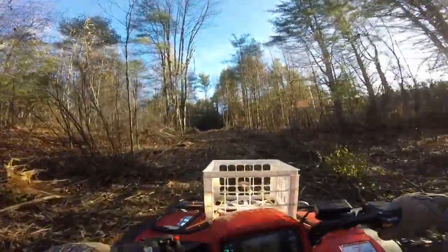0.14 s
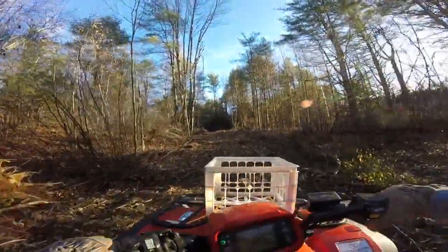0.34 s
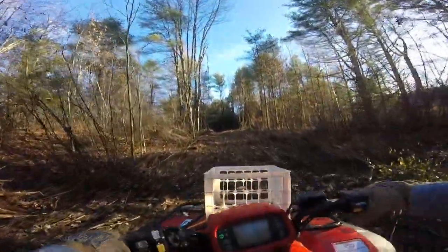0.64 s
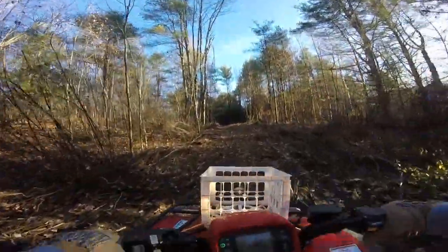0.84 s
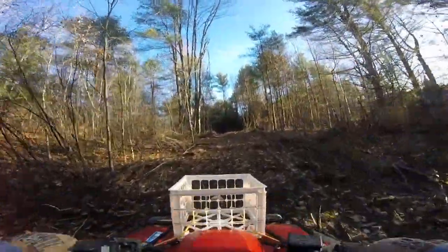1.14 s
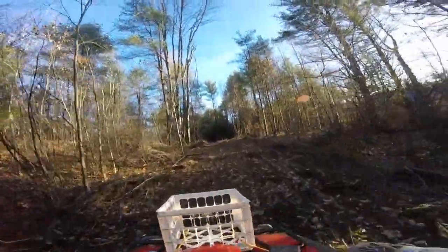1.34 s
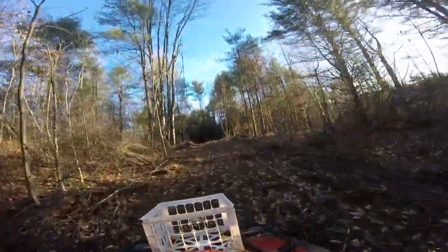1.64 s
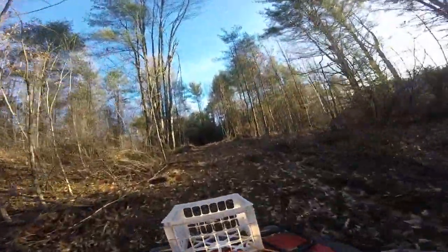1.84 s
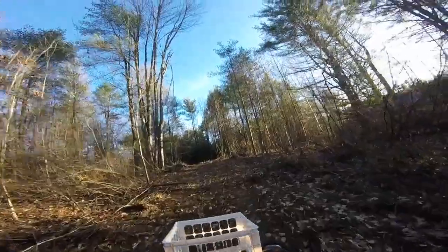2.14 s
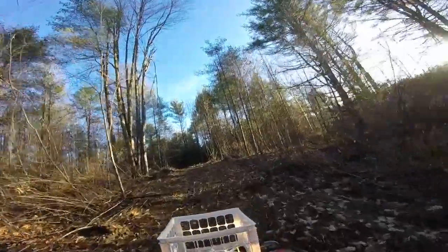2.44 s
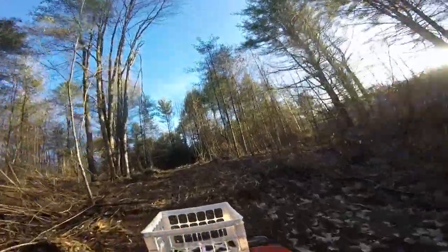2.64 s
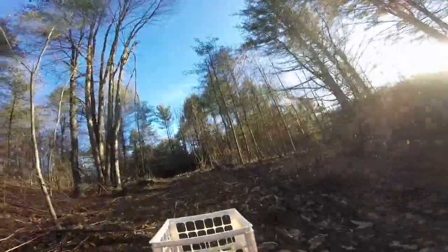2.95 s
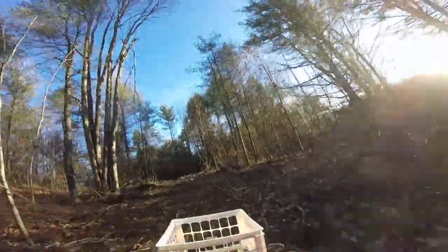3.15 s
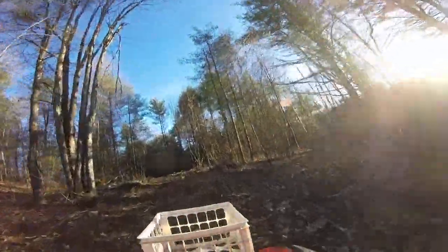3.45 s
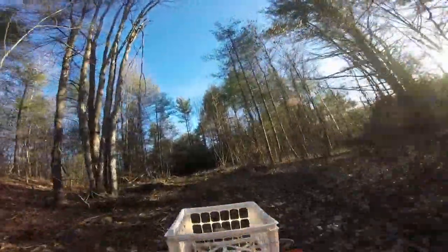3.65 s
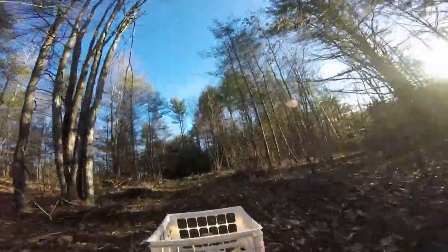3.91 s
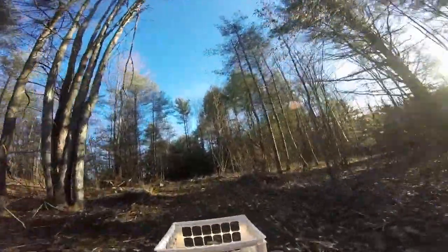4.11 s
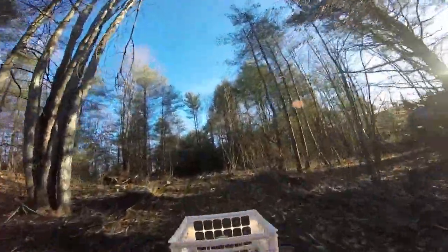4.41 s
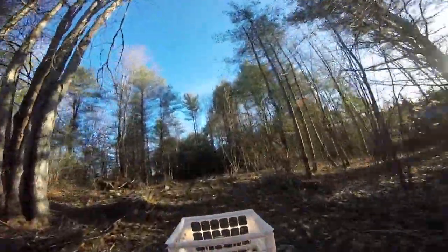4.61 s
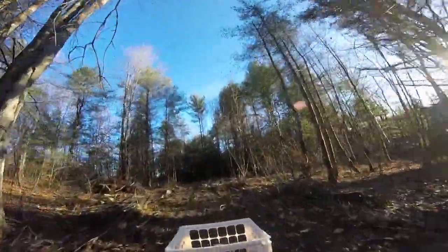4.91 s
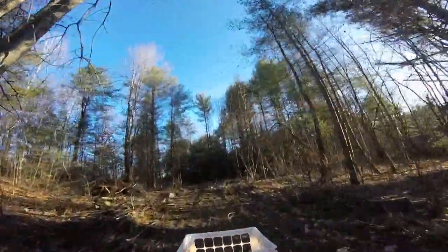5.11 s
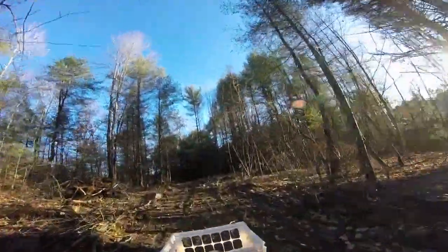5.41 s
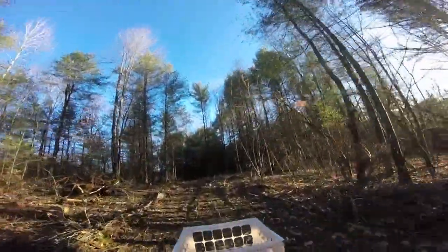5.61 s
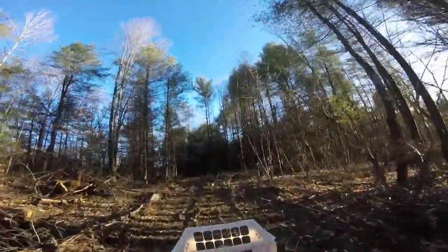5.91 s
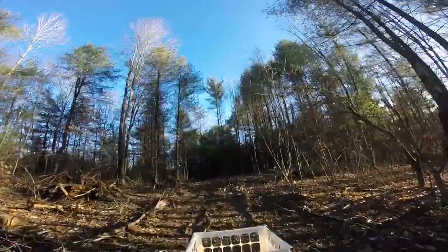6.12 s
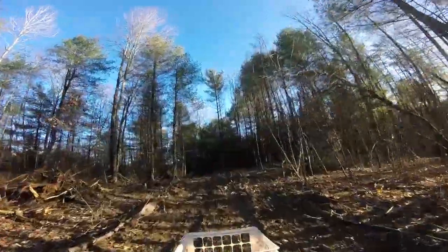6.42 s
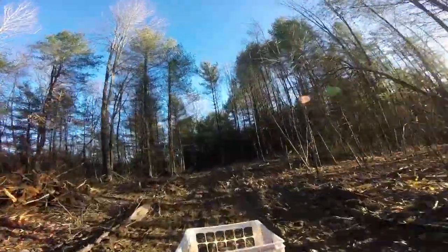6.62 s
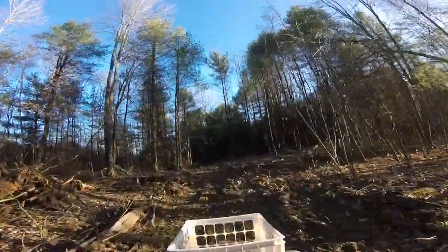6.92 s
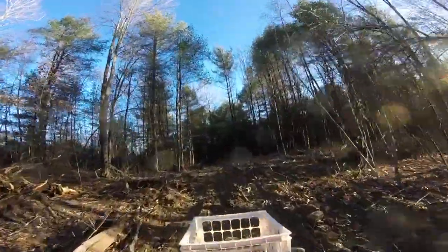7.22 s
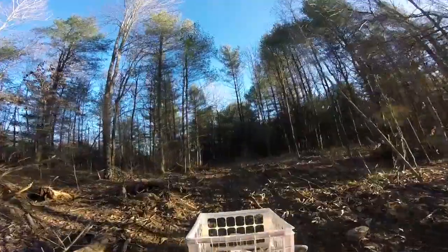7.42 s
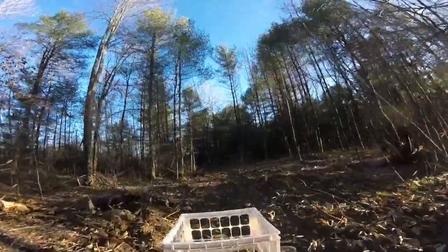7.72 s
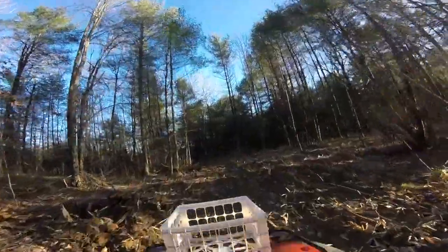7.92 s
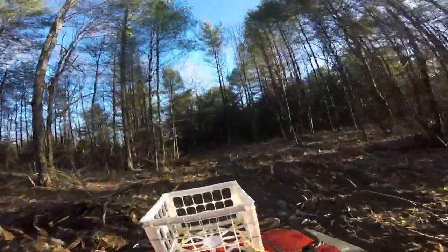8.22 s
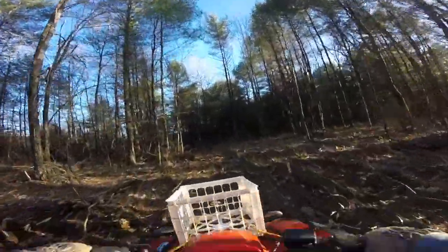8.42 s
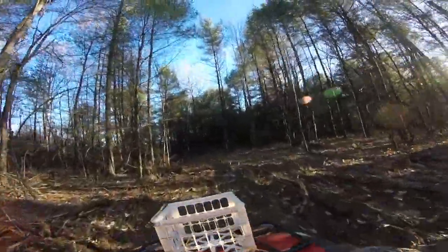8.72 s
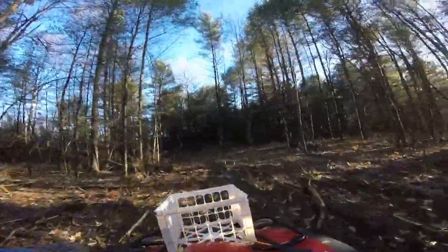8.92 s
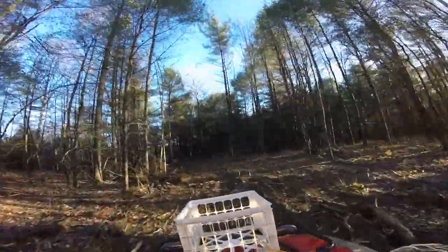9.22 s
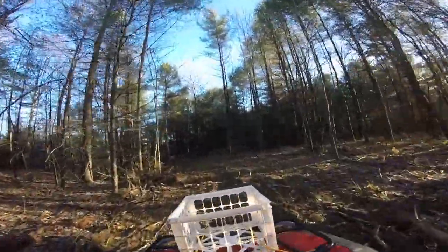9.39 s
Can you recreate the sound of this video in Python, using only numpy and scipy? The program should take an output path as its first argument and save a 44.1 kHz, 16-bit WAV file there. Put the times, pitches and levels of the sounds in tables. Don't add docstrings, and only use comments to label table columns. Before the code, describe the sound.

A single-cylinder quad bike putters steadily through woods, its valve gear clattering, while tyres snap dry twigs, rustle leaves and jolt the frame.

```python
import sys
import numpy as np
from scipy import signal
from scipy.fft import rfft, irfft, next_fast_len
from scipy.io import wavfile
from scipy.ndimage import uniform_filter1d

SR = 44100
rng = np.random.default_rng(int(sys.argv[2]) if len(sys.argv) > 2 else 0)


def gain_from_db(level_db):
    decades = np.asarray(level_db, float) / 20
    return 10 ** decades


def int16_out(signal):
    q = np.round(np.clip(np.atleast_2d(signal).T, -1, 1) * 32767)
    wavfile.write(sys.argv[1], SR, q.astype(np.int16))


N = 421155
TIME = np.arange(N) / SR


def shape(points, size):
    hz, db = np.transpose(points)
    bins_hz = np.fft.rfftfreq(size, 1 / SR)
    return gain_from_db(np.interp(np.log(bins_hz + 1), np.log(hz), db))


def unit(x):
    return x / np.sqrt(np.mean(x ** 2))


def band(x, lo_hz, hi_hz, order=2):
    edges = [lo_hz, min(hi_hz, .45 * SR)]
    return signal.sosfilt(signal.butter(order, edges, "band", fs=SR, output="sos"), x + 1e-18)


def ring(x, hz, width_hz):
    return signal.lfilter(*signal.iirpeak(hz, hz / width_hz, fs=SR), x + 1e-18)


def walk(rate):
    hold = int(SR / rate)
    steps = np.repeat(rng.standard_normal(N // hold + 1), hold)
    return unit(uniform_filter1d(uniform_filter1d(steps, hold), hold)[:N])


def grit(shape_of, scatter_db):
    sizes_db = scatter_db * np.minimum(rng.exponential(size=shape_of), 3)
    return unit(rng.standard_normal(shape_of) * gain_from_db(sizes_db))


def curves(table):
    s, *columns = np.transpose(table)
    return [np.interp(TIME, s, c) for c in columns]


def swells(table, rest_db):
    t = TIME[::64]
    power = gain_from_db(rest_db) ** 2
    for s, db, half_s in table:
        power = power + gain_from_db(db) ** 2 * np.exp(-((t - s) / half_s) ** 2)
    return np.interp(TIME, t, np.sqrt(power))


def add(out, s, sound):
    i = int(s * SR)
    out[i:i + len(sound)] += sound[:N - i]


def decay(t60, rise_s, size=6000):
    t = np.arange(size) / SR
    return (1 - np.exp(-t / rise_s)) * np.exp(-np.log(1000) * t / max(t60, .004))


# time in seconds, rate in Hz.
FIRING_RATE = [(0.0, 19.1), (0.9, 19.1), (1.65, 22.0), (2.2, 26.8), (2.74, 28.3), (3.48, 28.1),
               (3.69, 26.4), (4.01, 26.4), (4.15, 24.9), (5.6, 27.8), (6.36, 27.1), (6.49, 25.0),
               (7.05, 26.3), (7.88, 26.2), (8.01, 23.9), (8.32, 25.3), (8.5, 23.6), (9.55, 23.9)]
CRUISE_HZ = 26


def crank_motion():
    hz, = curves(FIRING_RATE)
    faster = hz - CRUISE_HZ
    turns = .5 + np.cumsum(hz * (1 + .003 * walk(9))) / SR
    size_db = rng.standard_normal((N // 1000, 3))[turns.astype(int)].T
    firing = np.exp(-(turns % 1) / .15)
    return faster, turns, size_db, firing


# frequency in Hz, width in Hz, level in dB.
PIPE_MODES = [(105, 30, 0), (135, 32, 2.5)]
# frequency in Hz, width in Hz, level
# in dB.
BARK_MODES = [(95, 35, -0.5), (225, 34, 2), (277.7, 45, -2.5), (320, 32, -22)]


def pipe_modes(puffs, modes):
    out = 0
    for k, (hz, width_hz, db) in enumerate(modes):
        out = out + (-1) ** k * gain_from_db(db) * ring(ring(puffs, hz, width_hz), hz, width_hz)
    return unit(out)


def exhaust(faster, turns, size_db):
    pulses = np.diff(turns.astype(int), prepend=0) * gain_from_db(size_db[0])
    pipe = pipe_modes(pulses, PIPE_MODES)
    bark = pipe_modes(pulses * gain_from_db(3.0 * size_db[1]), BARK_MODES)
    return pipe * gain_from_db(-49.5 + 0.43 * faster) + bark * gain_from_db(-57.5 - 1.53 * faster)


# centre in seconds, peak level in dB, half length in seconds.
LABOUR_SWELLS = [(0.0, -41, 0.18), (0.77, -38.5, 0.24), (1.65, -42, 0.27), (2.22, -42.5, 0.038),
                 (3.9, -49.5, 0.6), (5.2, -51, .2), (5.9, -47.5, 0.16), (7.2, -49, 1.2), (8.46, -43, 0.079),
                 (9.18, -44, 0.046), (9.55, -60, 0.17)]


def crank_shake(turns):
    twice = swells(LABOUR_SWELLS, rest_db=-58.5) * gain_from_db(3.0 + 1.5 * walk(6)) * np.sin(2 * np.pi * 2 * turns)
    return twice + gain_from_db(-53.5 + 1.2 * walk(4.6)) * np.sin(2 * np.pi * turns)


SHROUD_HZ, SHROUD_WIDTH_HZ, SHROUD_DB, SHROUD_DB_PER_HZ = 1481, 69, -23.5, 0.5


def valve_gear(faster, turns, size_db, firing):
    closing = np.exp(-((turns + .45) % 1) / .15)
    gate = 1 + 1.3 * closing * gain_from_db(1.5 * size_db[1]) + .4 * firing
    grind = gain_from_db(0.53 * walk(25)) * grit(N, scatter_db=3.0)
    drone_gain = gain_from_db(0.5 + 0.17 * faster + 2.0 * walk(40)) * gate ** 0.25
    drone = drone_gain * band(grind, 356, 2130, order=3)
    clatter = drone + gate * band(grind, 2800, 18700, order=3)
    tappet_blow = np.exp(-((turns + .85) % 1) / .1) * gain_from_db(3.0 * size_db[2])
    tappet = ring(rng.standard_normal(N) * tappet_blow, 6300, 600)
    cam_blow = np.exp(-((turns + .45) % 1) / .18) * gain_from_db(2.0 * size_db[1])
    cam = ring(grind * cam_blow, 3340, 260)
    shroud = ring(grind, SHROUD_HZ, SHROUD_WIDTH_HZ)
    gear = unit(clatter) + gain_from_db(-12) * unit(tappet)
    gear += gain_from_db(-19 - 1.1 * faster) * unit(cam)
    gear += gain_from_db(SHROUD_DB + SHROUD_DB_PER_HZ * np.minimum(faster, 0)) * unit(shroud)
    return gear * gain_from_db(-47.5 + 0.08 * faster)


# centre in seconds, peak level in dB, half length in seconds.
WIND_GUSTS = [(0.6, -56, 0.78), (1.68, -42, 0.19), (2.55, -45, 0.17), (3.45, -50, 0.42), (4.5, -49, 0.37),
              (5.05, -41.5, 0.075), (6.2, -48, 0.085), (6.67, -45, 0.099), (7.07, -45.5, 0.13),
              (8.3, -48, 0.44), (8.7, -40, 0.057), (9.0, -40, 0.15)]


def wind():
    return unit(band(rng.standard_normal(N), 9.1, 34.8)) * swells(WIND_GUSTS, rest_db=-50)


# time in seconds, rise of the rumble in dB.
ROUGHNESS = [
    (0.0, -5.5),
    (0.5, 1.5),
    (1.5, -2),
    (3.3, 1),
    (5.1, -2),
    (5.8, -0.5),
    (6.3, -2.5),
    (8.6, 0),
    (8.9, 0),
    (9.55, -2),
]
# frequency in Hz, density in dB per Hz.
RUMBLE_SPECTRUM = [(35, -28), (60, 2.5), (124, -6.5), (179, -5), (229, -3.5), (855, -19.5), (1200, -18),
                   (1560, -31), (2640, -120)]


def tyre_rumble(firing):
    rough_db, = curves(ROUGHNESS)
    size = next_fast_len(N, real=True)
    shaking = grit(N, scatter_db=4.0) * (1 + 0.31 * firing)
    rumble = irfft(rfft(shaking, size) * shape(RUMBLE_SPECTRUM, size), size)[:N]
    return unit(rumble) * gain_from_db(-48.5 + rough_db + 1.6 * walk(14))


# centre in seconds, peak level in dB, half length in seconds.
LEAF_DRIFTS = [
    (2.5, -38, 0.48),
    (3.25, -44.5, 0.44),
    (4.3, -46, 0.48),
    (5.75, -42.5, 0.55),
    (7.0, -82, 0.4),
    (8.7, -44, 0.14),
    (9.5, -47, 0.24),
]


def dry_leaves():
    rustle = band(grit(N, scatter_db=4.0), 5000, 16000)
    return rustle * swells(LEAF_DRIFTS, rest_db=-45.5) * gain_from_db(2.4 * walk(18) + 0.8)


# start in seconds, peak level in dB.
THIN_TICKS = [(0.0832, -40), (0.5521, -41), (0.6365, -38), (0.6878, -36), (0.8954, -39), (0.9772, -43),
              (1.5105, -40), (1.7963, -33), (1.8821, -36), (2.238, -41), (2.2894, -28), (2.3111, -32),
              (2.3494, -38), (2.4094, -34), (2.4694, -35), (2.5292, -38), (3.6356, -37), (3.651, -29.5),
              (3.7845, -39), (5.398, -35), (5.599, -30), (5.801, -21), (5.9584, -37), (8.0222, -37),
              (8.5305, -33), (8.5494, -32.5), (8.9585, -34), (9.0718, -37), (9.175, -34)]
# start in seconds, peak level in dB, dull knock in dB, decay time T60 in seconds.
THICK_BREAKS = [(0.3626, -43, -29, 0.11), (1.906, -29, -15, 0.039), (1.944, -31.5, -19, 0.045),
                (2.376, -31, -31, 0.21), (4.2615, -32, -12, 0.032), (5.3897, -24.5, -11.5, 0.086),
                (5.5379, -22.5, -7, 0.034), (5.5802, -28, -13, 0.059), (5.676, -19.5, -9, 0.067),
                (5.8012, -29.5, -7, 0.094), (6.0691, -27.5, -13.5, 0.11), (6.2856, -36, -17, 0.12),
                (6.3098, -35, -10, 0.081), (6.905, -38, -20, 0.074), (7.43, -34.5, -8, 0.041),
                (8.143, -35.5, -19, 0.085), (4.03, -37, -13, 0.046), (7.1204, -27, -10, 0.044),
                (8.532, -28.5, -18, 0.044)]
GREEN_BREAKS = [
    (1.8655, -31, -4, 0.064),
    (3.2999, -34, -21, 0.1),
    (8.3618, -39, -10, 0.34),
    (8.6798, -35.5, -11, 0.059),
    (8.921, -36.5, -6, 0.069),
    (9.1073, -25.5, -34, 0.039),
    (9.2237, -16, -13, 0.016),
    (6.2858, -29, -18, 0.027),
]
ROTTEN_BREAKS = [
    (3.92, -31, -13, 0.057),
    (5.4674, -33, -8, 0.27),
    (7.608, -24, -9, 0.094),
    (5.4938, -10, -27, 0.04),
    (8.4825, -38, -6, 0.2),
    (8.77, -33, -20, 0.04),
]
MIDDLE_BREAKS = [
    (2.3169, -39, -29, 0.07),
    (2.6803, -41, -15, 0.055),
    (2.6953, -35.5, -11, 0.091),
    (5.7405, -31.5, -17, 0.036),
    (5.8585, -22, -34, 0.031),
    (5.8707, -26, -13, 0.053),
    (6.1552, -38, -8, 0.12),
    (6.214, -25.5, -18, 0.032),
]
THIN_BREAKS = [(1.7965, -44, -22, 0.17), (1.8148, -38, -28, 0.12), (2.008, -28.5, -33, 0.036),
               (2.2088, -32, -22, 0.097), (2.2245, -32.5, -20, 0.09), (2.2635, -26, -31, 0.066),
               (2.4993, -39, -12, .039), (2.5391, -30, -25, 0.025), (5.2994, -29, -25, 0.04),
               (6.0, -35.5, -25, 0.061), (7.803, -36, -20, 0.065), (8.496, -29.5, -25, 0.032),
               (8.8992, -31, -15, 0.094), (9.195, -29.5, -20, 0.057)]
# pitch in Hz, hollow part in dB, splinter tick in dB; the other kinds have the same columns.
GREEN_WOOD = (1940, -14, -42)
THICK_WOOD, ROTTEN_WOOD, MIDDLE_WOOD, THIN_WOOD = (2020, 1, -8.5), (2280, 0, -12), (2670, -9, -8), (3100, -5, -8)


def twigs():
    snap, hollow, dull, thin = np.zeros((4, N))
    kinds = [(THICK_BREAKS, THICK_WOOD), (GREEN_BREAKS, GREEN_WOOD), (ROTTEN_BREAKS, ROTTEN_WOOD),
             (MIDDLE_BREAKS, MIDDLE_WOOD), (THIN_BREAKS, THIN_WOOD)]
    breaks = [(*row, *wood) for rows, wood in kinds for row in rows]
    ticks = THIN_TICKS + [(s, db + tick_db) for s, db, *_, tick_db in breaks]
    cracks = grit((len(breaks), 6000), scatter_db=1.5)
    steps = np.repeat(rng.standard_normal((len(breaks), 60)), 100, axis=1)
    bunches = gain_from_db(2.2 * uniform_filter1d(steps, size=40))
    for (s, db, dull_db, t60, hz, hollow_db, _), crack in zip(breaks, cracks * bunches):
        burst = crack * (decay(t60, 0.0009) + 0.35 * decay(0.005, 0.0003)) * gain_from_db(db)
        add(snap, s, gain_from_db(-0.5) * burst + gain_from_db(3.5) * ring(burst, hz, 0.079 * hz))
        add(hollow, s, gain_from_db(hollow_db) * burst)
        add(dull, s, gain_from_db(dull_db + 15.5) * burst)
    for (s, db), crack in zip(ticks, grit((len(ticks), 6000), scatter_db=-38.0)):
        add(thin, s, gain_from_db(db + 14.5) * crack * decay(0.024, 0.00065))
    high = band(snap, 1300, 8900) + band(hollow, 740, 1230) + band(thin, 5060, 16000)
    return band(dull, 177, 1020, order=3), high


# start in seconds, peak level in dB, pitch in Hz, decay time T60 in seconds.
RACK_JOLTS = [(0.13, -40, 252, 0.091), (0.339, -58, 220, 0.11), (1.165, -35, 181, 0.3),
              (1.546, -26, 240, 0.077), (1.829, -25, 183, 0.17), (1.863, -22.5, 189, 0.1),
              (3.302, -34.5, 253, 0.21), (3.694, -37.5, 310, 0.31), (3.734, -23, 217, 0.085),
              (3.857, -32, 275, 0.11), (4.259, -37.5, 232, 0.22), (4.419, -32.5, 217, 0.12),
              (6.716, -31, 267, 0.074), (6.917, -35, 193, 0.33), (7.415, -29, 230, 0.092),
              (7.755, -32, 153, 0.17), (7.829, -25, 209, 0.091), (8.144, -29, 460, 0.062),
              (8.357, -28.5, 204, 0.11), (8.424, -32.5, 194, 0.2), (8.65, -28, 177, 0.081),
              (8.851, -27, 198, 0.15), (8.919, -25, 251, 0.046), (9.279, -30, 235, 0.16),
              (9.318, -17, 203, 0.031), (9.508, -30.5, 307, 0.057)]


def thuds():
    rings, rattle = np.zeros((2, N))
    for (s, db, hz, t60), shake in zip(RACK_JOLTS, grit((len(RACK_JOLTS), 6000), scatter_db=4.5)):
        burst = shake * decay(t60, 0.011) * gain_from_db(db)
        add(rings, s, gain_from_db(21.5) * ring(ring(burst, hz, 0.36 * hz), hz, 0.36 * hz))
        add(rattle, s, gain_from_db(12.5) * burst)
    return rings + band(rattle, 169, 446)


# start in seconds, end in seconds, teeth per firing, level in dB.
GEAR_WHINES = [
    (1.42, 1.72, 36, -64),
    (4.45, 5.25, 34.6, -68),
]


def gear_whine(turns):
    out = np.zeros(N)
    for start, end, teeth, db in GEAR_WHINES:
        progress = np.clip((TIME - start) / (end - start), 0, 1)
        swell = np.sqrt(np.abs(np.sin(np.pi * progress)))
        out += swell * gain_from_db(db + 3.0 * walk(30)) * np.sin(2 * np.pi * teeth * turns)
    return out


# loudest moment in seconds, stems in dB, leaves in dB,
# swell in dB per second, fade in dB per second.
BRUSH_PASSES = [
    (1.822, -36, -43, 400, 82),
    (2.285, -45, -37.5, 103, 250),
    (2.322, -31, -35, 700, 241),
    (3.65, -38, -46, 500, 24),
    (5.3, -40, -47, 200, 55),
    (5.512, -28.5, -42, 900, 218),
    (8.486, -39, -61, 400, 112),
    (9.09, -36.5, -66, 300, 15),
    (9.19, -62, -48, 112, 900),
]
BRUSH_REACH_S = 0.314


def brush():
    t, stems, leaves = TIME[::16], 0, 0
    for s, stem_db, leaf_db, swell, fade in BRUSH_PASSES:
        touch_db = np.where(t < s, swell * (t - s), fade * (s - t))
        touch = gain_from_db(touch_db) * (np.abs(t - s) < BRUSH_REACH_S)
        stems = stems + gain_from_db(stem_db) * touch
        leaves = leaves + gain_from_db(leaf_db) * touch
    stems, leaves = (np.interp(TIME, t, uniform_filter1d(gain, size=30)) for gain in (stems, leaves))
    cracks = grit(N, scatter_db=4.0) * gain_from_db(2.2 * walk(200))
    return gain_from_db(-6.5) * stems * band(cracks, 450, 5200) + gain_from_db(8.5) * leaves * band(cracks, 3300, 23000)


# start in seconds, low rings in dB, top rings in dB relative to them.
CLIP_STROKES = [(1.7, -48, -23), (1.8144, -47, -19), (2.0104, -53, -39), (2.3644, -45, -23),
                (2.5292, -37, -32), (2.5411, -46, -35), (2.582, -54, -27), (2.7934, -63, -10),
                (2.8054, -47, -17), (3.5264, -57, -10), (3.7843, -46, -23), (3.9762, -47, -24),
                (4.3056, -49, -22), (4.6359, -40.5, -23), (5.0285, -45.5, -22), (5.3702, -62, -26),
                (6.5321, -53, -30), (7.0234, -54, -11), (7.3432, -56, -16), (7.869, -64, -22),
                (7.9189, -56, -19), (8.0222, -47, -24), (9.0748, -47, -22), (9.419, -49, -26)]
CLIP_LOW_MODES = [(7915, 0, .1), (8615, -4, .07), (9505, -7, .06), (10200, -16, .05)]
CLIP_TOP_MODES = [(11630, -6, .06), (12635, 0, .06), (14585, 0, .09)]


def tinks():
    out, t = np.zeros(N), np.arange(6000) / SR
    for (s, low_db, top_db), chance in zip(CLIP_STROKES, rng.standard_normal((len(CLIP_STROKES), 8))):
        modes = [(hz, db - 7.0, t60) for hz, db, t60 in CLIP_LOW_MODES]
        modes += [(hz, db + top_db + 2.0, t60) for hz, db, t60 in CLIP_TOP_MODES]
        for (hz, db, t60), c in zip(modes, chance):
            tone = np.sin(2 * np.pi * hz * (1 + 0.0017 * c) * t)
            add(out, s, gain_from_db(low_db + db + 3.2 * c) * decay(t60, 0.00046) * tone)
    return out


def crush(table, width):
    rise_s, t60_s = .0015, .018
    out, t = np.zeros(N), np.arange(5000) / SR
    for (s, db, hz, held_s), cracks in zip(table, grit((len(table), 5000), scatter_db=0.5)):
        release = np.exp(-np.log(1000) * np.maximum(t - held_s, 0) / t60_s)
        load = (1 - np.exp(-t / rise_s)) * release
        add(out, s, gain_from_db(db) * load * unit(ring(cracks, hz, width * hz)))
    return out


# start in seconds, level in dB, pitch in Hz, hold in seconds.
BRUSH_CRUNCHES = [(1.862, -49.5, 1500, 0.013), (2.2217, -32, 6300, 0.011), (2.238, -27, 6400, .008),
                  (2.257, -28, 6050, 0.012), (2.268, -45, 3280, 0.02), (2.273, -29.5, 6300, 0.027),
                  (2.311, -26.5, 7700, 0.021), (2.3105, -34.5, 3250, 0.014), (2.316, -40.5, 1530, .012),
                  (2.315, -36.5, 2570, 0.0135), (8.532, -39, 2120, 0.0042), (2.3455, -31, 7860, 0.011),
                  (2.379, -28, 6300, 0.0041), (2.388, -39, 4100, 0.014), (2.538, -40, 3400, 0.0073),
                  (3.65, -45, 3300, 0.0072), (4.2605, -46, 4130, 0.0039), (6.3095, -42.5, 1940, 0.0056),
                  (3.725, -49, 2080, 0.03), (3.784, -41, 3300, 0.0031), (5.401, -26, 6200, 0.0042),
                  (5.529, -43, 3400, 0.0062), (5.548, -41, 3870, 0.011), (5.5697, -45, 2110, .004),
                  (5.6495, -54, 1460, .006), (5.672, -61, 2000, 0.0022), (5.494, -20, 2100, 0.0064),
                  (5.675, -38, 1410, 0.0054), (1.8, -44, 3220, 0.025), (9.2235, -30, 3320, 0.0025),
                  (7.612, -47.5, 1470, 0.019), (8.498, -55, 1490, 0.014), (8.77, -52.5, 1460, .015),
                  (9.072, -46.5, 3200, 0.026), (9.1745, -21, 8000, 0.0046), (9.176, -47, 1700, 0.0066),
                  (9.219, -33.5, 2630, .004), (9.227, -40.5, 1480, 0.0065)]


def crunches():
    return crush(BRUSH_CRUNCHES, width=.22)


# start in seconds, level in dB, pitch in Hz, hold in seconds.
FRAME_SCRAPES = [(3.695, -41.5, 270, 0.024), (3.4, -51, 590, 0.028), (6.9, -43, 330, .03),
                 (8.368, -41, 380, 0.018), (8.448, -45, 460, .02), (8.652, -41, 250, .016),
                 (9.9, -39.5, 520, 0.016), (9.282, -44, 480, 0.062), (9.316, -37, 1440, .014),
                 (5.1, -46, 700, 0.01), (1.862, -42, 660, 0.01), (1.835, -43, 260, 0.047),
                 (3.73, -39.5, 220, 0.028)]


def scrapes():
    return band(crush(FRAME_SCRAPES, width=.6), 90, 2200)


PANEL_EDGES = [300, 1300, 1520, 1800, 2300, 2900, 3600, 5000, 7000, 19000]


def panels(x):
    out = 0
    for k, (lo_hz, hi_hz) in enumerate(zip(PANEL_EDGES, PANEL_EDGES[1:])):
        out = out + (-1) ** k * gain_from_db(.3 * walk(3.063) + 1.0 * walk(22)) * band(x, lo_hz, hi_hz)
    return out


# frequency in Hz, width in Hz, level in dB.
CASE_MODES = [(1460, 252, 1.5), (2034, 370, -7), (2000, 310, -16), (2570, 130, -6), (2754, 150, -9),
              (2942, 126, -10.5), (3312, 300, -8), (3920, 185, -18), (4140, 59, -20.5), (5520, 140, -31.5),
              (6050, 160, -25.5), (6540, 80, -29), (7870, 700, -33), (8790, 380, -32)]
# frequency in Hz, level in dB.
CASE_LEAKAGE = [(300, -7), (900, -16), (1200, -22), (2400, -17), (4500, -26.5), (5200, -31.5), (7300, -35),
                (9500, -40), (11000, -45), (15500, -53.5)]


def case(x):
    size = 4096
    bins_hz = np.fft.rfftfreq(size, 1 / SR)
    power = shape(CASE_LEAKAGE, size) ** 2
    for hz, width_hz, db in CASE_MODES:
        power = power + gain_from_db(db) ** 2 / (1 + (2 * (bins_hz - hz) / width_hz) ** 2) ** 2
    cepstrum = irfft(np.log(power) / 2)
    cepstrum[1:size // 2] *= 2
    cepstrum[size // 2 + 1:] = 0
    response = irfft(np.exp(rfft(cepstrum)))[:size // 2]
    return signal.oaconvolve(x, response / np.linalg.norm(response))[:N]


def scene():
    faster, turns, size_db, firing = crank_motion()
    engine = exhaust(faster, turns, size_db) + crank_shake(turns) + gear_whine(turns)
    clatter = valve_gear(faster, turns, size_db, firing)
    knocks, cracks = twigs()
    mount = engine + wind() + tyre_rumble(firing) + knocks + thuds() + tinks() + scrapes()
    air = dry_leaves() + cracks + brush() + crunches()
    return (mount + case(panels(clatter) + air))[None]


def roll_off(x):
    return signal.sosfilt(signal.butter(12, 15960, fs=SR, output="sos"), x)


def record(dry):
    top = signal.ellip(8, .2, 60, 15100, fs=SR, output="sos")
    return roll_off(signal.sosfilt(top, dry))


dry = scene()
out = record(dry)
int16_out(out)
```